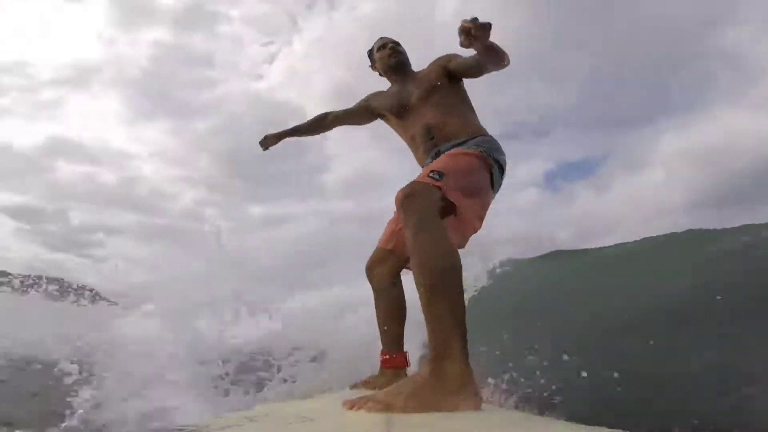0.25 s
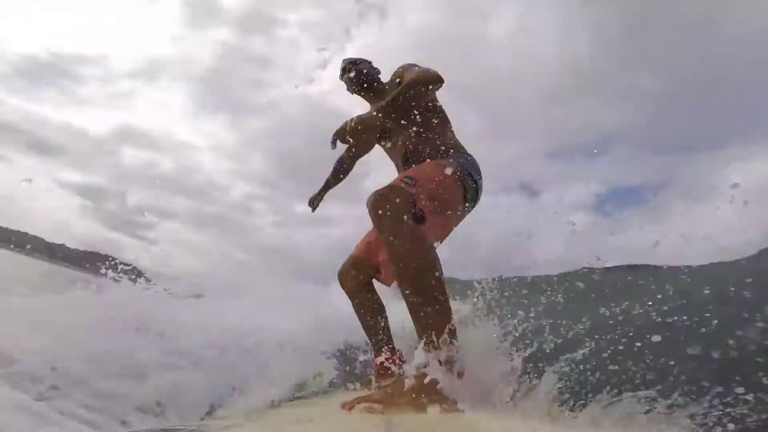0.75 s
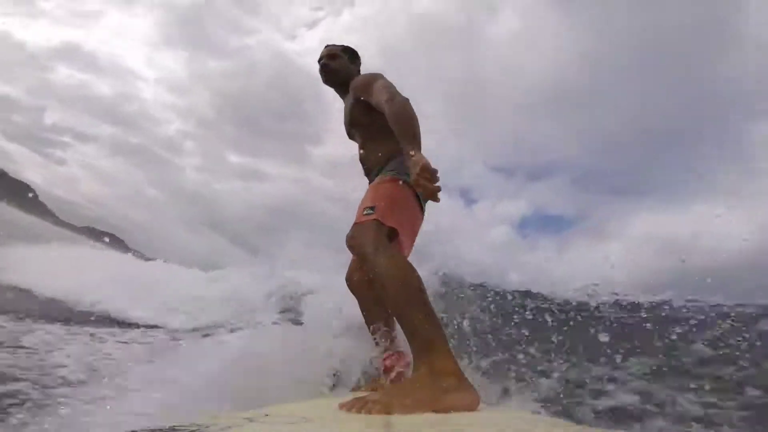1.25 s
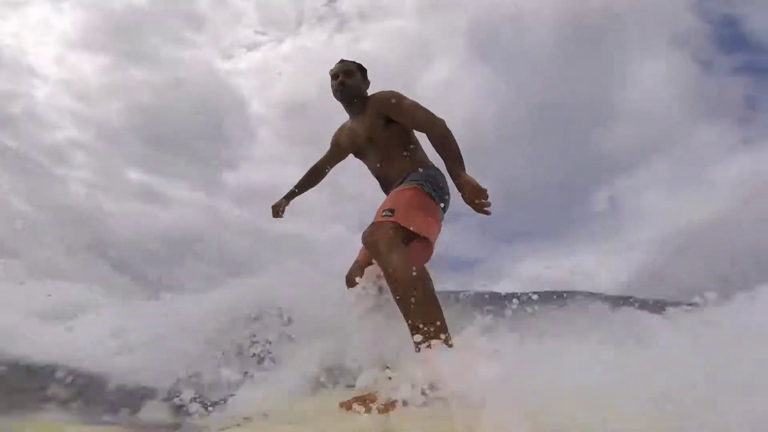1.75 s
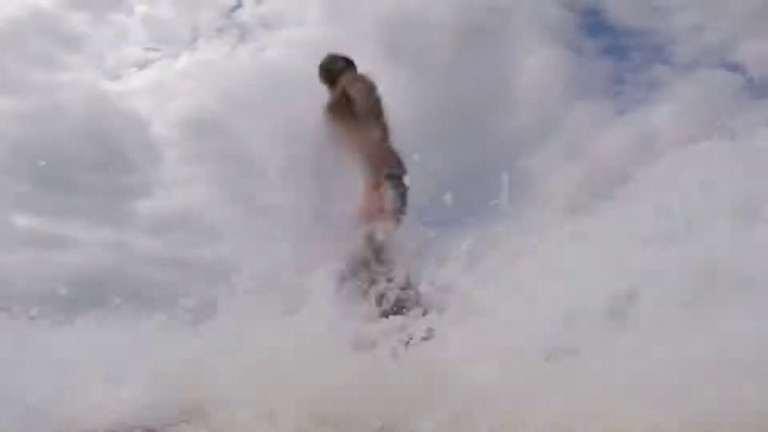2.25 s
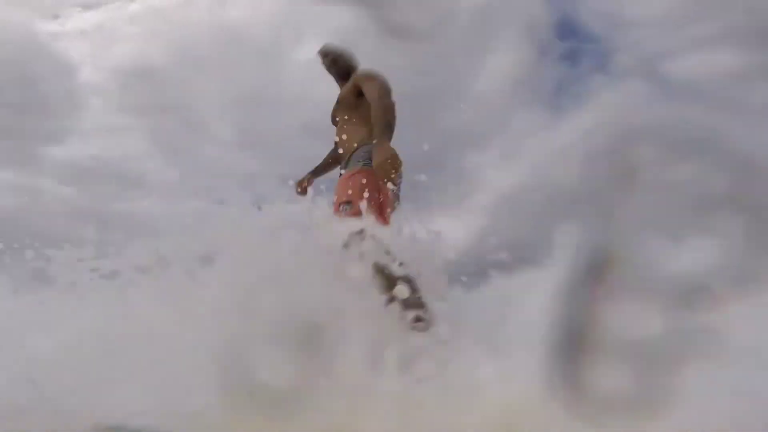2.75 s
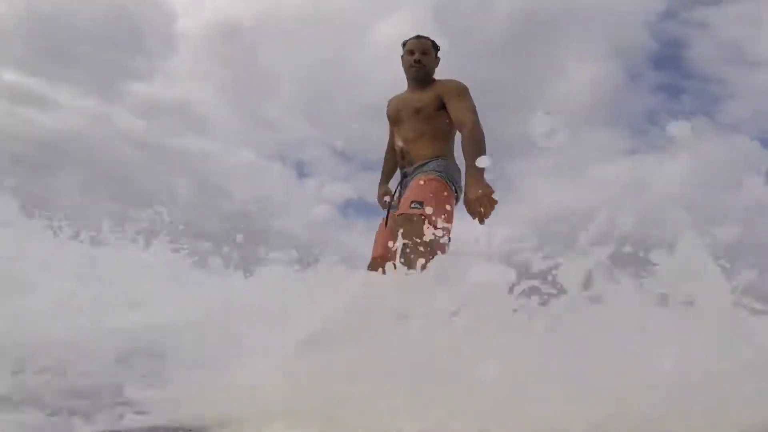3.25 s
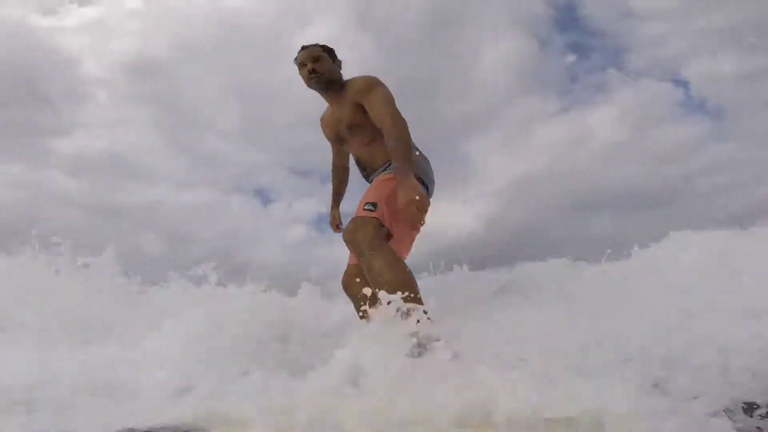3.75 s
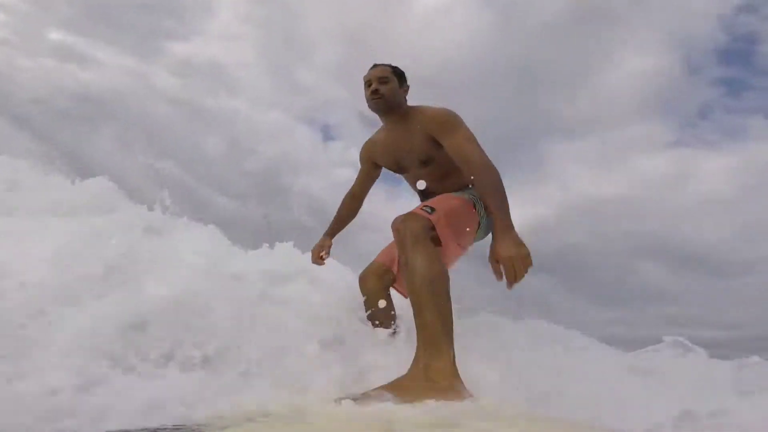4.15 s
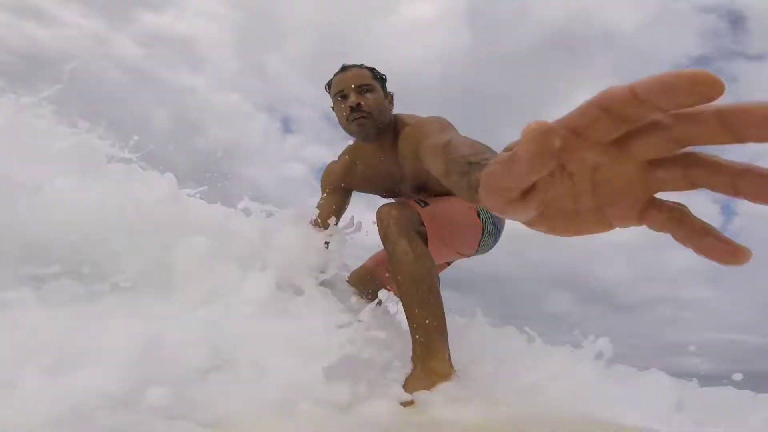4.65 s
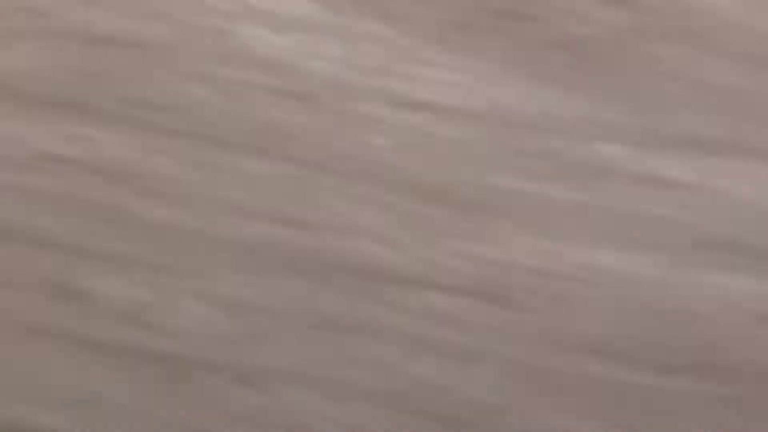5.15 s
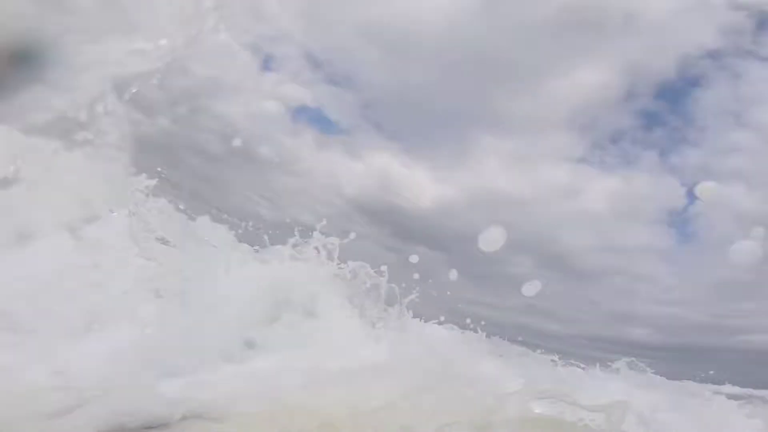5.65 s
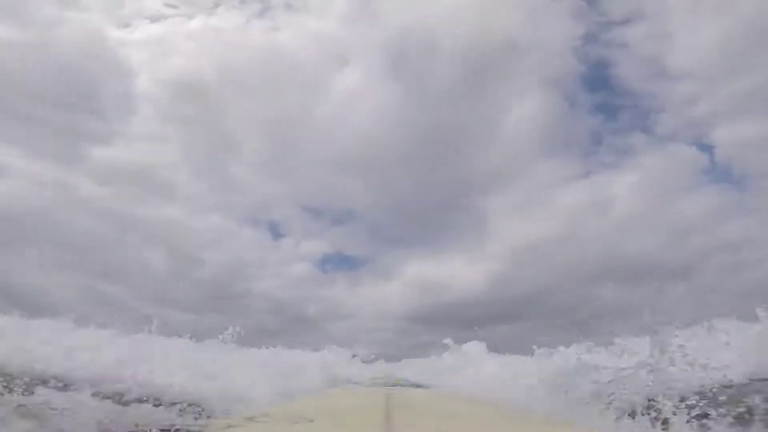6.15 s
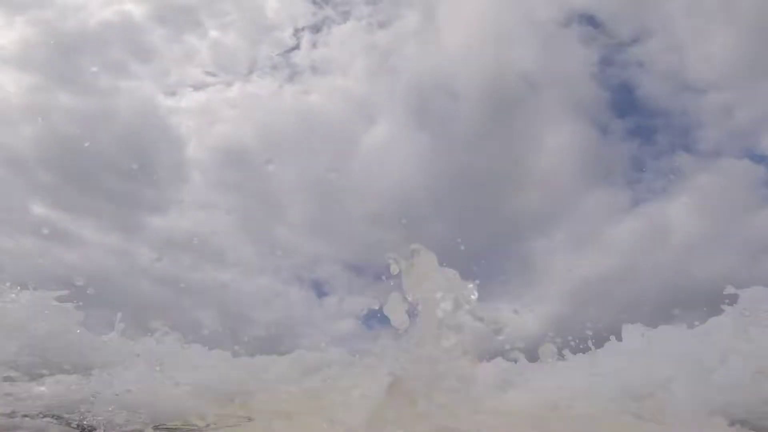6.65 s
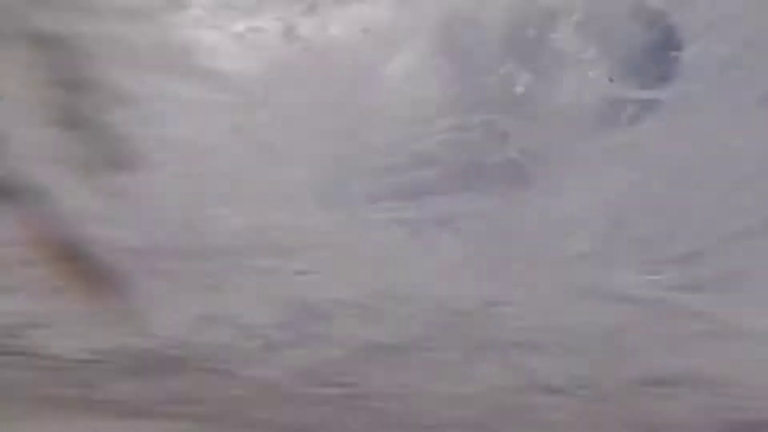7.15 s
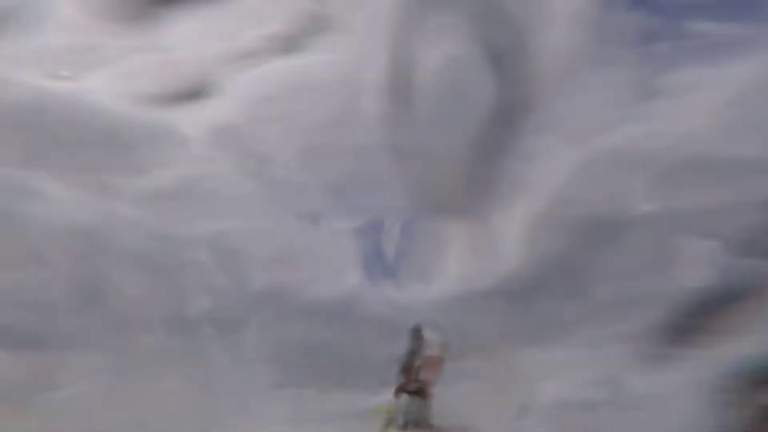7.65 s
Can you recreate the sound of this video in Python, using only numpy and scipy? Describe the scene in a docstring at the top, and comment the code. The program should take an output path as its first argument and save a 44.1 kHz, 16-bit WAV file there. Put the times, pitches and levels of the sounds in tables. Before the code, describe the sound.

Close at a housed microphone on a surfboard at sea, foamy whitewater hisses over a low heaving rumble, its treble edge sweeping up and down. Around two seconds a heavy thump and slaps briefly seal the sound into muffled quiet; the hiss creeps back softer. At five seconds the microphone is flooded: hollow slosh, gurgles, sharp watery slaps, bubbles and deep thuds continue in uneven bursts until the end.

```python
"""Whitewater hisses around a camera on a surfboard: lumpy noise, coloured by the microphone port
and by a film of water whose treble edge climbs and drops, with spray getting in above that edge.
Under foam one hears slosh in a trapped air pocket: knocking noise, ticks and ringing bubbles.
Gurgles glide in pitch, slaps and thumps are decaying tones, and steps are short pressure jumps.
Behind it all, filtered noise makes a heaving rumble and the churn of water along the board."""
import sys
import numpy as np
from scipy import signal
from scipy.io import wavfile
from scipy.ndimage import uniform_filter1d

SR = 44100
rng = np.random.default_rng(int(sys.argv[2]) if len(sys.argv) > 2 else 0)


def materialize(psi):
    """Save the field psi as 16-bit PCM at rate SR to the path in sys.argv[1].

    A 1-D psi becomes a single channel; in a 2-D psi each row is a channel.
    """
    bounded = np.clip(np.atleast_2d(psi).T, -1, 1)
    quanta = np.round(bounded * 32767).astype(np.int16)
    wavfile.write(sys.argv[1], SR, quanta)


N = 348105

# water and wind pushing on the housing: t/s, rumble level/dB, churn level over the water's own/dB
BUFFET_CURVE = [(0, -32.5, -1.5), (.6, -31.5, 0.5), (.78, -28, 6.5), (.97, -30, -9.5), (1.4, -24.5, 0.5),
                (2.05, -25, 2), (2.15, -23, -2.5), (2.25, -33, 7.5), (2.44, -44, -0.5), (2.86, -35.5, 1.5),
                (3.25, -29, 3), (3.55, -33, 1), (3.72, -36.5, 4.5), (4.1, -26.5, 2), (4.9, -28, 3),
                (5.21, -31.5, 0), (5.33, -27, -0.5), (5.41, -16.5, 1.5), (5.56, -24, -2), (5.89, -41.5, -4),
                (6.11, -32.5, 2.5), (6.35, -40.5, -4), (6.57, -26, -3.5), (6.8, -26.5, -9),
                (7.03, -32.5, -7), (7.34, -37.5, -8), (7.5, -29, 2.5), (7.89, -28.5, -17)]
# single heaves of the rumble: middle t/s, peak level/dB, half length/s
RUMBLE_HEAVES = [(0, -21.5, 0.058), (0.813, -16, 0.025), (1.95, -18, 0.045), (2.16, -17, 0.016),
                 (2.52, -28, 0.016), (2.914, -23.5, 0.037), (3.16, -32, 0.037), (3.51, -22, 0.091),
                 (3.95, -34, 0.03), (4.447, -24, 0.076), (4.991, -20, 0.011), (6.407, -33, 0.069),
                 (6.803, -31, .015), (6.913, -19, 0.023), (7.154, -21, 0.045)]
# a body of water hits the housing: t/s, level/dB, middle pitch f/Hz, time to fall by 60 dB/s
THUMP_HITS = [(0.717, -5.5, 317, 0.074), (2.154, 8, 110, 0.024), (2.242, -6, 160, 0.027),
              (2.267, -10, 107, 0.041), (2.507, -13.5, 119, 0.043), (2.873, -13.5, 98, 0.17),
              (4.971, -2.5, 56.3, 0.076), (5.369, -22, 61.9, 0.039), (5.417, -9, 120, 0.095),
              (5.971, -8, 89, 0.046), (6.092, -9, 62, 0.092), (6.206, -6, 248, 0.03),
              (6.566, -4.5, 65.6, 0.081), (6.598, -2, 159, 0.07), (6.658, -10, 98, 0.088),
              (7.128, -17, 59, 0.22), (7.499, -29, 110, 0.071), (7.86, -7.5, 77.5, 0.046)]
# the membrane jumps as water seals or frees the port: t/s, level/dB, settling time/s
MEMBRANE_STEPS = [(2.191, -5.5, 0.0005), (2.221, -13, 0.0028), (2.326, -9, 0.0013), (2.362, -8.5, 0.0013),
                  (5.007, -10, .002)]
# drops and slaps that ring the port: t/s, ring level/dB, starting pitch f/Hz, crack level/dB
PORT_SLAPS = [(.1355, -8.5, 6480, -40), (.173, -8.5, 3270, -23), (2.1464, -22, 2470, -20),
              (2.184, -14, 704, -55), (2.2418, -6.5, 630, -34), (2.2414, -13, 1220, -55),
              (2.253, -37, 1490, -26), (2.27, -16, 556, -42), (2.3306, -16, 1140, -14),
              (5.061, -2.5, 1280, -36), (5.065, -2, 930, -33), (5.087, -8, 870, -47),
              (5.126, -9.5, 1220, -50), (5.178, -36.5, 3180, -55), (5.235, -11.5, 786, -58),
              (5.309, -6.5, 1210, -51), (5.352, -3.5, 1300, -41), (5.489, -11, 1170, -44),
              (5.552, -9, 1330, -37), (5.585, -21, 2010, -32), (5.655, -12, 1120, -57),
              (5.778, -17, 1150, -50), (6.171, -30, 1850, -50), (6.203, -24, 1640, -50),
              (6.561, -18, 1690, -42), (6.57, -9, 1770, -38), (6.644, -3.5, 1120, -52),
              (6.769, -8, 1220, -56), (6.795, -6, 1270, -58), (6.831, -21, 1250, -25),
              (6.889, -8, 900, -50), (6.903, -12, 1140, -54), (6.916, -8, 1160, -52),
              (7.099, -20, 1200, -49), (7.42, -21, 1500, -40), (7.521, -14.5, 1040, -52),
              (7.622, -24, 740, -47), (7.711, -8, 824, -49), (7.724, -6.5, 990, -56), (7.739, -5, 980, -46),
              (7.757, -5, 950, -54), (7.795, -14.5, 1690, -53), (7.803, -8.5, 1230, -61),
              (7.818, -10, 1000, -60), (7.851, -22, 791, -43), (7.869, -12.5, 1100, -30)]
# air squeezing through the flooded port, one table a gurgle: t/s, pitch f/Hz, level/dB
GURGLE_GLIDES = [
    [(5.012, 780, -36), (5.04, 470, -31), (5.056, 606, -39)],
    [(5.087, 550, -21), (5.105, 374, -26)],
    [(5.095, 845, -36), (5.125, 1210, -27), (5.138, 1670, -35), (5.148, 2700, -37)],
    [(5.105, 2460, -43), (5.135, 2260, -39)],
    [(5.13, 490, -20), (5.15, 673, -27.5), (5.185, 867, -30), (5.22, 926, -36), (5.26, 756, -34.5),
     (5.3, 666, -24)],
    [(5.77, 588, -37), (5.79, 564, -32.5), (5.82, 530, -51), (5.86, 563, -46)],
    [(5.86, 1130, -53), (6.06, 1150, -47)],
]
# foam over the camera, one table a stretch: t/s, level/dB
SLOSH_STRETCHES = [
    [(2.15, -54), (2.24, -43), (2.37, -57)],
    [(4.972, -31.5), (5.058, -25), (5.1, -43.5), (5.15, -44.5), (5.23, -35), (5.24, -31), (5.31, -26),
     (5.335, -26), (5.436, -22), (5.454, -33), (5.546, -25), (5.72, -38), (5.8, -46), (6.05, -43),
     (6.07, -35.5), (6.164, -41), (6.172, -28.5), (6.21, -28.5), (6.225, -37), (6.36, -38.5), (6.51, -34.5),
     (6.56, -21.5), (6.572, -19.5), (6.8, -19.5), (6.85, -24), (6.917, -21), (6.98, -30), (7.07, -33),
     (7.134, -37), (7.206, -37.5), (7.248, -29), (7.39, -35), (7.55, -33), (7.7, -29.5), (7.78, -32),
     (7.82, -24.5), (7.9, -47)],
]
# short splashes on top of the slosh: peak t/s, peak level/dB
SLOSH_SPLASHES = [(2.149, -18.5), (2.19, -28.5), (2.27, -43), (4.992, -21.5), (5.789, -34.5), (6.096, -28),
                  (6.283, -30.5), (6.794, -23), (7.104, -20.5), (7.876, -23.5)]
# how the flooded port colours the slosh: t/s, air pocket pitch f/Hz, upper cavity level/dB,
# change in the level of leaking treble/dB
POCKET_CURVE = [(2.15, 720, -24, -17), (2.37, 800, -6, -6), (4.97, 800, -1, 10), (5.04, 705, -28, -14),
                (5.06, 1020, -17, 14), (5.13, 1150, -12, -14), (5.2, 790, -8, 0), (5.31, 1200, -1.5, -16),
                (5.41, 1014, -6, 1), (5.6, 1120, -6.5, 3.5), (5.75, 1000, -0.5, -21), (5.9, 1300, -4, -6),
                (6.1, 1100, -1, -11), (6.17, 1556, 10.5, -9), (6.5, 1600, 12.5, -4), (6.575, 1480, 1.5, 10),
                (6.69, 1146, -10, -3.5), (6.9, 1140, -2.5, 4), (7.03, 900, -7, -5), (7.1, 1060, 2.5, -2),
                (7.15, 1400, 6, 18.5), (7.4, 1200, -3, 9), (7.57, 934, -5.5, -4), (7.8, 1040, -2, -6),
                (7.89, 1020, 1, 1)]
# basic spectrum of the treble that leaks through the flooded port: f/Hz, level/dB
LEAK_SPECTRUM = [(880, -30), (1500, -6.5), (1600, -5.5), (3490, -27), (4700, -45), (7980, -53.5),
                 (10800, -66.5), (14100, -104), (22000, -120)]
# whitewater through the air, one table a stretch: t/s, level/dB, fizz (tilt towards bright)/dB
WHITEWATER_STRETCHES = [
    [(0, -32, 0.5), (.23, -33.5, 1.5), (.72, -29, -0.5), (.82, -29, 3), (.92, -30, -1), (1.02, -29, -2),
     (1.34, -31.5, 0), (1.71, -26.5, 1), (2.0, -28.5, 0), (2.1, -36, 3.5), (2.153, -27, -4.5),
     (2.162, -60, -17), (2.23, -47, 1), (2.27, -75, -10), (2.34, -64, -3), (2.38, -52, 0), (2.72, -46, -2),
     (3.07, -37, 1), (3.56, -37.5, -2.5), (3.68, -35, 1), (4.66, -33, -0.5), (4.83, -30.5, -1),
     (4.91, -30.5, 0.5), (5.01, -46, 0)],
]
# sheets of spray that briefly swell (or, if negative, dip) the whitewater: middle t/s, swell level/dB
SPRAY_SHEETS = [(.37, 3.5), (.53, 3), (.78, 0), (.87, 3.5), (1.81, 0.5), (2.092, 4.5), (2.745, 2.5),
                (2.88, 3), (3.7, -1.5), (4.72, 2.5)]
# how the microphone port colours the whitewater: f/Hz, level/dB
PORT_SPECTRUM = [(25, -13), (150, -9.5), (400, 2), (1100, -5), (3600, -13), (4600, -17), (5700, -16),
                 (6050, -24.5), (6300, -9), (6520, -4), (6900, -11.5), (7400, -14), (9700, -19.5),
                 (10350, -41.5), (14000, -88)]
# the film over the port thins and its edge climbs: start t/s, end t/s, ceiling of the edge f/Hz
FILM_THINNINGS = [(-.1, 0.153, 4930), (0.397, 0.685, 4220), (1.037, 1.4, 4740), (1.796, 1.928, 6400),
                  (1.75, 2.007, 4830), (2.354, 2.974, 9400), (2.7, 3.455, 8930), (3.187, 3.708, 10300),
                  (3.55, 3.85, 4770), (3.9, 4.084, 6360), (4.0, 4.27, 4920), (4.25, 4.513, 7800),
                  (4.4, 4.633, 4800), (4.63, 4.818, 5300)]
# treble of the whitewater: t/s, level through the film/dB, level of spray that gets past it/dB
TREBLE_CURVE = [(0, 19, 2), (.15, -20, 1), (.72, -5, -4), (.8, -2, 4), (.9, -24, -3.5), (1.3, 6, 0.5),
                (1.5, -8, -2), (1.85, 6.5, 1), (2.15, -14, -5), (2.4, 3, 1), (2.88, -6, 5),
                (2.9, -10.5, -21), (3.5, -18.5, -12), (3.7, -8, -19), (4.4, -5.5, -14.5), (4.82, -3.5, -13),
                (5.01, 2, -21)]
# water seals the port for a moment, muffling rumble, slosh and hiss: start t/s, length/s, level drop/dB
PORT_SEALS = [(2.099, 0.053, 9.5), (2.194, 0.04, 12.5), (4.941, 0.026, 16.5), (5.015, 0.039, 21),
              (5.731, 0.042, 4.5), (6.514, 0.046, 13), (6.83, 0.065, 11.5), (7.106, 0.03, 7.5),
              (7.821, 0.029, 12)]

T_S = np.arange(N) / SR
HIT_T_S = np.arange(6000) / SR  # time since a hit
FRAME_S = np.arange(N // 128 + 2) * 128 / SR  # times of the spectrum frames
HZ = np.fft.rfftfreq(512, 1 / SR)[:, None]  # frequencies of the spectrum, as a column

SLAP_T60_S, SLAP_ONSET_CYCLES = 0.0075, 0.33
PORT_HZ, PORT_WIDTH_HZ, PORT_RING_DB = 6500, 500, 9.5  # the port's ring, in cracks and leaking treble
PORT_FLOODED_S = 5.68  # from here the port is full of water and no longer rings
UPPER_HZ, UPPER_WIDTH_HZ = 1950, 900  # a second cavity of the housing, steady in pitch
LEAK_FLICKER_DB = 5  # the leaking treble comes in spurts
SPLASH_RISE_DB_PER_S, SPLASH_FALL_DB_PER_S = 600, 1106
SHEET_HALF_S = 0.018
REST_HZ = 4130  # edge of the film when it is thick
CLIMB_HZ_PER_S, DROP_HZ_PER_S = 36600, 54000  # edge speed near rest; it slows towards the ceiling
SPRAY_LOSS_DB_PER_KHZ = 6  # a thin film means less spray on the port
SEAL_EDGE_S = 0.0051
CUTOFF_HZ = 11000


def gain_of(db):
    """Turns decibels into a plain multiplier."""
    return 10 ** (np.asarray(db) / 20)


def evened(x):
    """Scales x to an average strength (rms) of 1."""
    return x / np.sqrt(np.mean(x ** 2) + 1e-20)


def read_spectrum(points, hz):
    """Reads a table of levels at the frequencies hz, on a logarithmic pitch scale."""
    f, value = np.transpose(points)
    return np.interp(np.log(hz + 1), np.log(f + 1), value)


def add(mix, s, sound):
    """Adds a sound to the mix from time s on, cut off at the end of the mix."""
    part = mix[round(s * SR):][:len(sound)]
    part += sound[:len(part)]


def read_columns(tables, t):
    """Reads the joined tables at times t, with a smoothed gate that is open only inside them."""
    s, *rest = np.transpose(np.vstack(tables))
    inside = sum((t >= rows[0][0]) & (t <= rows[-1][0]) for rows in tables)
    gate = uniform_filter1d(inside * 1., size=150)
    return gate, [np.interp(t, s, column) for column in rest]


def lumpy(lump_s, lump_db):
    """Noise whose strength jumps about from lump to lump, rms 1."""
    lumps = evened(uniform_filter1d(rng.standard_normal(N), max(1, int(lump_s * SR))))
    return evened(rng.standard_normal(N) * gain_of(lump_db * lumps))


def bandpassed(x, lo, hi):
    """Keeps the band from lo to hi in Hz, rms 1."""
    return evened(signal.sosfilt(signal.butter(2, [lo, hi], "bandpass", fs=SR, output="sos"), x))


def coloured(x, colour, lo, hi, patchy_db):
    """Gives x a moving, patchy spectrum, its gain evened out between lo and hi in Hz."""
    frames = signal.stft(x, nperseg=512, noverlap=384)[2]
    colour = (colour * np.ones((1, len(FRAME_S))))[:, :frames.shape[1]]
    patches = uniform_filter1d(rng.standard_normal(colour.shape), size=5, axis=0)  # across pitch
    patches = uniform_filter1d(patches, size=18, axis=1)  # across time
    colour = colour * gain_of(patchy_db * evened(patches))
    band = (HZ >= lo) & (HZ <= hi)
    power = uniform_filter1d((colour ** 2 * band).mean(0), size=9)
    shaped = frames[:, :colour.shape[1]] * colour / np.sqrt(power)
    return signal.istft(shaped, nperseg=512, noverlap=384)[1][:N]


def resonate(x, hz, width):
    """Shifts the curve hz down to zero, smooths, and shifts back: a resonance of gain 1."""
    turn = np.exp(2j * np.pi * np.cumsum(hz) / SR)
    r = np.exp(-np.pi * width / SR)
    return 2 * (turn * signal.lfilter([1 - r], [1, -r], x / turn)).real


def buffet():
    """A lumpy low rumble that heaves and, above it, the churn of water along the board."""
    _, (rumble_db, churn_db) = read_columns([BUFFET_CURVE], T_S)
    heaves = sum(gain_of(db) * np.exp(-((T_S - s) / half) ** 2) for s, db, half in RUMBLE_HEAVES)
    rumble = bandpassed(lumpy(0.057, 1.54), 28, 125)
    churn = bandpassed(lumpy(0.017, 2.7), 150, 400)
    water = foam_level() + slosh_level()
    return np.hypot(gain_of(rumble_db), heaves) * rumble + gain_of(churn_db) * water * churn


def thumps():
    """Water hitting the housing makes low tones with a wobbling pitch that die away."""
    out, t = np.zeros(N), HIT_T_S
    for s, db, hz, t60 in THUMP_HITS:
        wobble = 1 + 0.33 * evened(uniform_filter1d(rng.standard_normal(len(t)), size=300))
        swing = np.sin(2 * np.pi * np.cumsum(hz * wobble) / SR)
        add(out, s, gain_of(db - 60 * t / t60) * (1 - np.exp(-t / 0.0046)) * swing)
    return out


def steps():
    """The membrane jumps one way, swings past its rest position and settles."""
    out, t = np.zeros(N), HIT_T_S
    for s, db, settle in MEMBRANE_STEPS:
        u = t / settle
        rise = (1 - np.exp(-t / .00007)) ** 3
        add(out, s, -gain_of(db) * rise * (1 - 0.74 * u) * np.exp(-.55 * u))
    return out


def slaps():
    """Drops and slaps ring briefly with rising pitch, plus a noisy crack that excites the open port."""
    out, t = np.zeros(N), HIT_T_S
    for s, db, hz, crack_db in PORT_SLAPS:
        cycles = hz * t * (1 + 12 * t)
        onset = (1 - np.exp(-cycles / SLAP_ONSET_CYCLES)) ** 2
        ring = onset * gain_of(-60 * t / SLAP_T60_S) * np.sin(2 * np.pi * cycles)
        crack = gain_of(crack_db) * np.exp(-t / 0.00084) * rng.standard_normal(len(t))
        port_ring = resonate(crack, np.full(len(t), PORT_HZ), PORT_WIDTH_HZ)
        crack = crack + (s < PORT_FLOODED_S) * gain_of(PORT_RING_DB + 10.0) * port_ring
        add(out, s, gain_of(db) * (.85 * ring / abs(ring).max() + crack))
    return out


def gurgles():
    """A gliding bubble tone, roughened by lumpy noise in a narrow resonance at the same pitch."""
    out, air = np.zeros(N), lumpy(.006, 2.5)
    for rows in GURGLE_GLIDES:
        t = np.arange(rows[0][0], rows[-1][0], 1 / SR)
        _, (hz, db) = read_columns([rows], t)
        rough = resonate(air[round(t[0] * SR):][:len(t)], hz, 110)
        rough = evened(resonate(rough, hz, 110))  # a second pass narrows it
        clear = .6 * np.sin(2 * np.pi * np.cumsum(hz) / SR)
        add(out, t[0], gain_of(db) * evened(rough + clear) * signal.windows.tukey(len(t), .15))
    return out


def slosh_level():
    """Gain of the slosh: the slow level or a splash, whichever is louder."""
    gate, (level_db,) = read_columns(SLOSH_STRETCHES, T_S)
    for s, db in SLOSH_SPLASHES:
        slope_db = np.minimum((T_S - s) * SPLASH_RISE_DB_PER_S, (s - T_S) * SPLASH_FALL_DB_PER_S)
        level_db = np.maximum(level_db, db + slope_db)
    return gate * gain_of(level_db)


def leaking_treble(leak_db):
    """Spectrum of the treble that gets through the water in spurts, with the port's ring until it floods."""
    leak = gain_of(read_spectrum(LEAK_SPECTRUM, HZ) + leak_db) * np.minimum(HZ / 2500, 1) ** 3
    port_ring = gain_of(PORT_RING_DB) / (1 + ((HZ - PORT_HZ) / (PORT_WIDTH_HZ / 2)) ** 2)
    leak = leak * (1 + (FRAME_S < PORT_FLOODED_S) * port_ring)
    spurts = evened(uniform_filter1d(rng.standard_normal(len(FRAME_S)), size=2))
    return leak * evened(gain_of(LEAK_FLICKER_DB * spurts))


def bubbles(pocket_hz):
    """Small bubbles ring around the air pocket's pitch, each rising as it nears the surface."""
    out, t = np.zeros(N), np.arange(2000) / SR
    for at, spread, size, ring in rng.random((600, 4)):
        pitch = np.interp(at * N / SR, FRAME_S, pocket_hz) * 2 ** (1.71 * (spread - .4))
        cycles = pitch * t * (1 + 13.0 * t)
        shape = (1 - np.exp(-cycles / .8)) * np.exp(-cycles / (1.5 + 4.5 * ring))
        add(out, at * N / SR, (1 - size) ** 3.1 * shape * np.sin(2 * np.pi * cycles))
    return evened(out)


def slosh():
    """Water knocks the trapped air pocket in bursts; small bubbles ring and droplets tick."""
    _, (pocket_hz, upper_db, leak_db) = read_columns([POCKET_CURVE], FRAME_S)
    ratio = HZ / pocket_hz
    pocket = 1 / np.sqrt((1 - ratio ** 2) ** 2 + (0.48 * ratio) ** 2)  # resonance
    pocket = pocket / np.sqrt(1 + (ratio / 1.61) ** 8)  # dull above the pitch
    pocket = pocket * np.minimum(ratio / 0.58, 1) ** 0.56  # weaker well below it
    upper = gain_of(upper_db) / (1 + ((HZ - UPPER_HZ) / (UPPER_WIDTH_HZ / 2)) ** 2) ** 1.74
    colour = np.sqrt(pocket ** 2 + upper ** 2 + leaking_treble(leak_db) ** 2)
    # about 45 ticks a second, of uneven strength
    ticks = (rng.random(N) < 45 / SR) * gain_of(16.0 + 5.1 * rng.standard_normal(N))
    knocks = coloured(lumpy(.004, 3.4) + ticks, colour, 500, 2500, patchy_db=2.0)
    return slosh_level() * (knocks + gain_of(-11.5) * bubbles(pocket_hz))


def foam_level():
    """Gain of the whitewater: its slow level with the brief swells of spray sheets."""
    gate, (level_db, _) = read_columns(WHITEWATER_STRETCHES, T_S)
    sheets_db = sum(db * np.exp(-((T_S - s) / SHEET_HALF_S) ** 2) for s, db in SPRAY_SHEETS)
    return gate * gain_of(level_db + sheets_db)


def film_edge():
    """Edge of the film in Hz: it climbs from rest, levels off towards its ceiling and drops back."""
    edge = np.full(len(FRAME_S), REST_HZ * 1.)
    for start, end, top_hz in FILM_THINNINGS:
        reach = np.minimum((FRAME_S - start) * CLIMB_HZ_PER_S, (end - FRAME_S) * DROP_HZ_PER_S)
        room = top_hz - REST_HZ
        edge = np.maximum(edge, REST_HZ + room * np.tanh(reach / room))
    return edge


def whitewater():
    """Hiss of bursting foam: treble under the edge passes the film, above it only spray gets in."""
    _, (_, fizz_db) = read_columns(WHITEWATER_STRETCHES, FRAME_S)
    _, (through_db, spray_db) = read_columns([TREBLE_CURVE], FRAME_S)
    edge_hz = film_edge()
    octaves = np.log2((HZ + 1) / 1000)
    tilt_db = fizz_db * np.clip(octaves / 1.3, -1, 1)
    treble = np.clip((HZ - 4100) / 1100, 0, 1)  # 0 below the treble, 1 inside it
    rim = 1 + 0.47 * np.exp(-((HZ / edge_hz - .93) / 0.081) ** 2)  # the film rings just under its edge
    film = gain_of(tilt_db * (1 - treble) + through_db * treble) * rim
    film = film / np.sqrt(1 + (HZ / edge_hz) ** 50)  # steep cut above the edge
    loss_db = SPRAY_LOSS_DB_PER_KHZ * (edge_hz - REST_HZ) / 1000
    spray = gain_of(spray_db - loss_db) / np.sqrt(1 + (4300 / (HZ + 1)) ** 12)
    colour = gain_of(read_spectrum(PORT_SPECTRUM, HZ)) * np.hypot(film, spray)
    return foam_level() * coloured(lumpy(.0015, 1.4), colour, 600, 1600, patchy_db=1.0)


def opening():
    """Gain of the port: 1, falling while water seals it."""
    shut_db = 0
    for s, length, drop_db in PORT_SEALS:
        inside_s = np.minimum(T_S - s, s + length - T_S)
        shut_db = shut_db + drop_db * np.clip(inside_s / SEAL_EDGE_S + .5, 0, 1)
    return gain_of(-shut_db)


def scene():
    """Rumble, slosh and hiss come through the port; gurgles and hits are not muffled by its sealing."""
    through_port = opening() * (buffet() + slosh() + whitewater())
    hits = thumps() + steps() + slaps()
    return (through_port + gurgles() + hits)[None]


def record(dry):
    """Loud water rounds off softly; then the highest treble is cut."""
    rounded = 0.83 * np.tanh(dry / 0.78)
    lowpass = signal.firwin(511, CUTOFF_HZ, window=("kaiser", 9), fs=SR)
    return signal.oaconvolve(rounded, lowpass[None], "same")


dry = scene()
out = record(dry)
materialize(out)
```